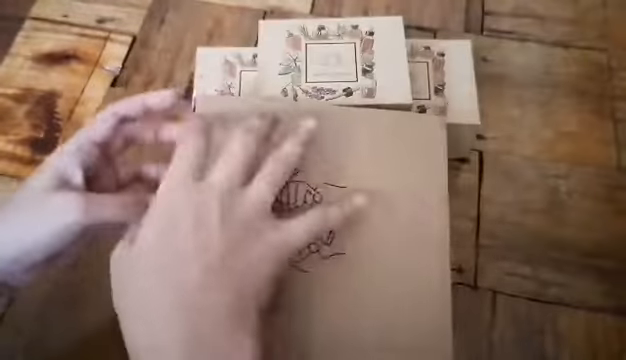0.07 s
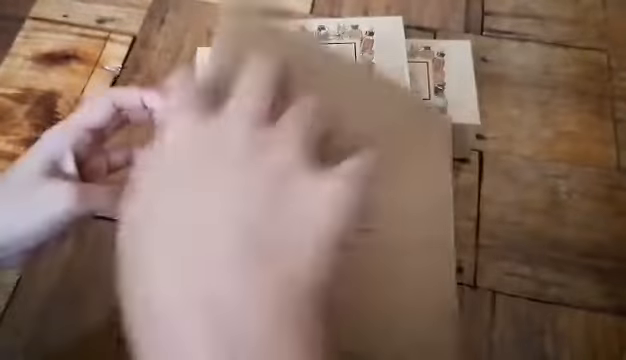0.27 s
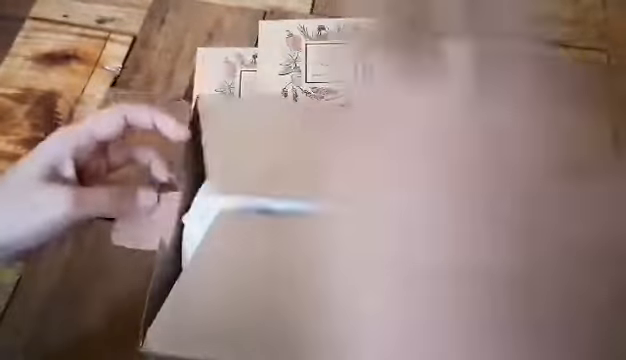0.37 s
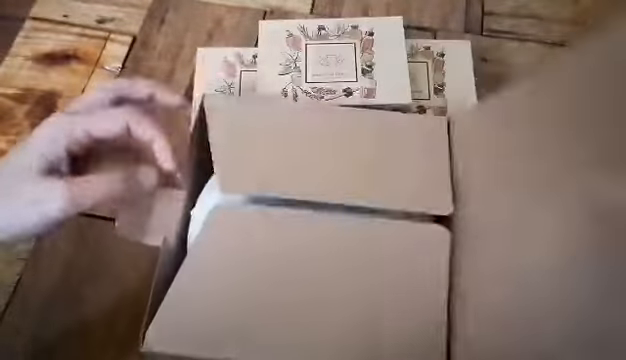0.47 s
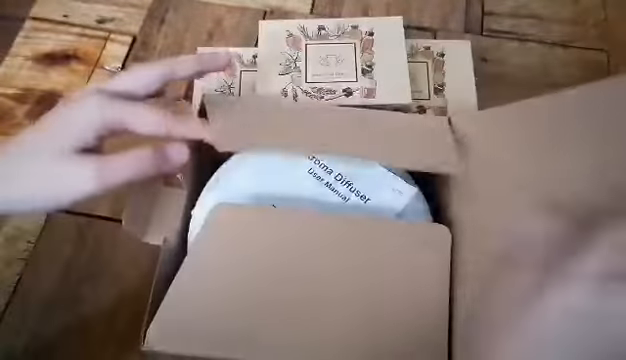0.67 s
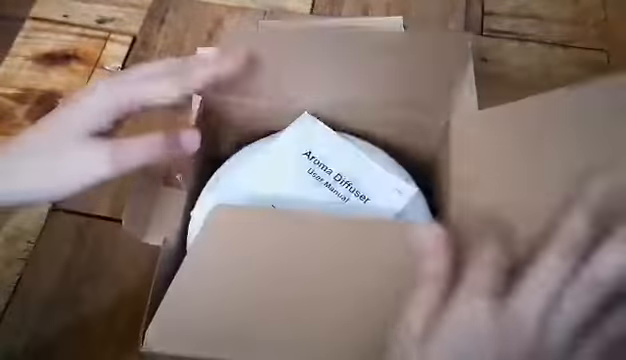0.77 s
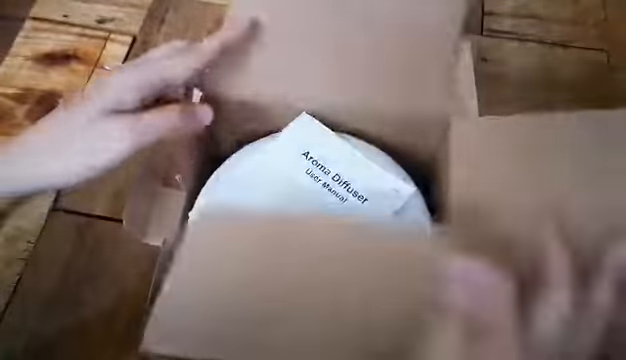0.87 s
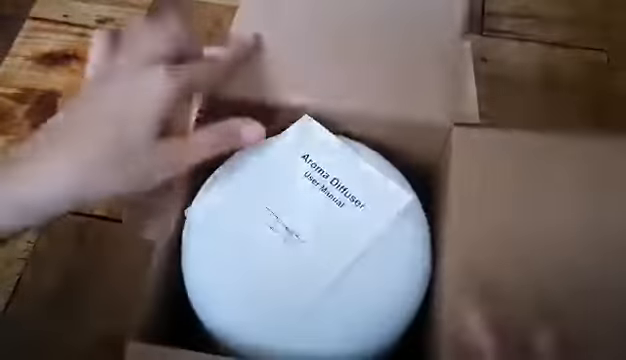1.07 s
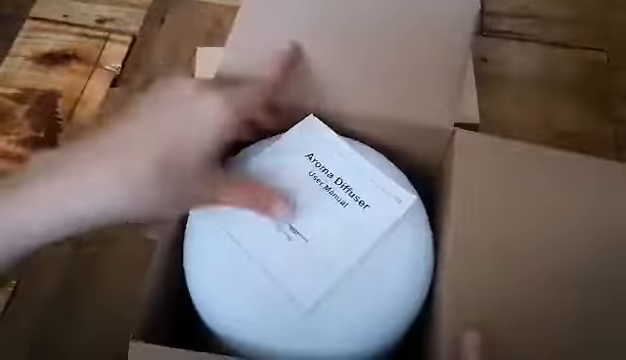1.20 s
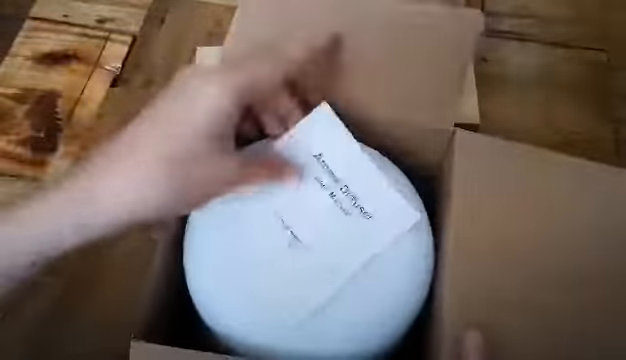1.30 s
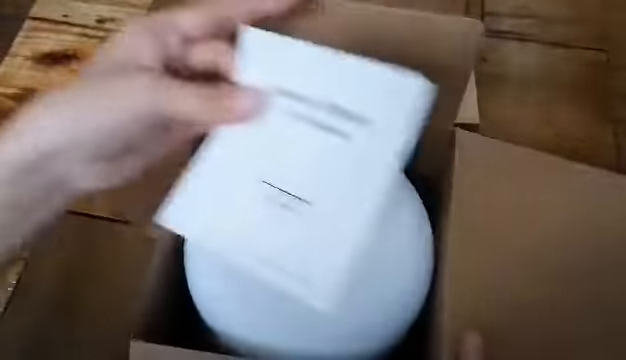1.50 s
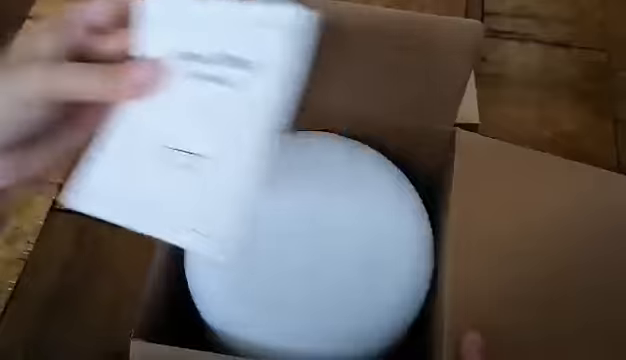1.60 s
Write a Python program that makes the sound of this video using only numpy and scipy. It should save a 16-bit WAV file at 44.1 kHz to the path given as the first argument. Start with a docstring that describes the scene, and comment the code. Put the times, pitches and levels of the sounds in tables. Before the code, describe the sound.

Cardboard flaps rub and snap open under tapping fingers, then a knock and brief paper slide.

```python
"""Hands open a cardboard box on a wooden table in a small live room, close by and a little to the right.
Fingers tap and rub the card, and the lid scrapes free by stick-slip friction (0.25 s). Flaps rub
and flex until one snaps open (0.66 s), driving the air in the hollow box into resonance. A finger
knocks on the contents (1.29 s), exciting the panel modes. Last, a paper leaflet slides out (1.5 s)."""
import sys
import numpy as np
from scipy import signal
from scipy.fft import rfft, irfft
from scipy.io import wavfile
from scipy.ndimage import uniform_filter1d

SR = 44100
rng = np.random.default_rng(int(sys.argv[2]) if len(sys.argv) > 2 else 0)


def wav_record(signal):
    """Record a signal, one row per channel, as 16-bit PCM in the file named by sys.argv[1]."""
    frames = np.transpose(np.atleast_2d(signal))
    bounded = np.clip(frames, -1, 1)
    # unit amplitude maps onto the largest positive 16-bit level
    quanta = np.round(bounded * 32767).astype(np.int16)
    wavfile.write(sys.argv[1], SR, quanta)


N = 72765
T = np.arange(N) / SR

# fingertips and nails on card (t/s, f/Hz, note level/dB, tick level/dB, pan L-R/dB)
FINGER_TAPS = [(.013, 871, -43, -59.5, -13.5), (.052, 858, -52, -54, 14), (.165, 810, -45.5, -73, -19.5),
               (.169, 1400, -48.5, -73, -16), (.581, 550, -50, -80, -4), (.618, 640, -43, -69, -10),
               (.679, 1040, -47, -57, -7), (.74, 724, -56, -47.5, -24.5), (.772, 650, -52, -49, -8),
               (.822, 1090, -43.5, -71, -5), (.946, 564, -46.5, -67, -2.5), (1.021, 838, -50, -62, 0),
               (1.191, 464, -39.5, -72, -1), (1.259, 650, -46.5, -53, -23.5), (1.37, 1014, -40, -60, -8),
               (1.374, 590, -59, -66, 1)]
# skin on the box (peak t/s, rise/s, fall/s, body level/dB, hiss level/dB, pan L-R/dB)
SKIN_RUBS = [(0.051, 0.049, 0.029, -64, -70, -4), (0.119, 0.024, 0.033, -66, -67.5, -1.5),
             (0.168, 0.013, 0.017, -56.5, -77, -4), (0.226, 0.017, 0.028, -56.5, -67, -2),
             (0.499, 0.06, 0.035, -56.5, -63.5, -5), (.62, 0.0068, 0.016, -65.5, -73.5, 9),
             (.72, 0.025, 0.026, -59.5, -58.5, -3), (0.854, 0.018, 0.022, -55.5, -57, -5.5),
             (.895, .03, 0.0094, -81, -58.5, -9.5), (0.998, 0.05, 0.036, -65.5, -60.5, -4.5),
             (1.12, .06, 0.18, -69.5, -68, -5), (1.207, 0.011, 0.015, -56, -55, -3),
             (1.261, 0.0077, 0.0048, -62, -52, -8), (1.33, 0.065, 0.056, -56, -92, -4.5),
             (1.38, 0.0025, 0.005, -47.5, -54, -6), (1.406, 0.02, 0.014, -79, -59.5, -3.5)]
# soft pushes on the panels (t/s, f/Hz, level/dB, T60/s)
PANEL_BUMPS = [(.164, 251, -42, 0.046), (0.281, 198, -39.5, 0.034), (.285, 92.6, -47.5, 0.11),
               (0.407, 271.5, -41, 0.057), (.435, 275, -33, 0.043), (0.487, 241.6, -46, 0.2),
               (0.54, 156, -46.5, 0.063), (.579, 300, -40, 0.12), (.597, 240, -45, 0.2),
               (0.613, 87, -37.5, 0.11), (0.669, 76, -51.5, 0.12), (0.837, 125.6, -41, 0.17),
               (0.867, 175, -43, 0.03), (.91, 238, -37, 0.032), (0.926, 125, -30.5, 0.028),
               (0.944, 167, -31.5, 0.068), (0.979, 181, -45, 0.027), (1, 144, -44.5, 0.08),
               (1.019, 210, -47, 0.046), (1.142, 143, -46.5, 0.13), (1.221, 118.5, -43, 0.2),
               (1.264, 98, -36.5, .1), (1.371, 300, -39, 0.035)]
# sliding lid, flap and leaflet (peak t/s, rise/s, fall/s, level/dB, pan L-R/dB)
LID_STROKES = [(.24, 0.0071, 0.019, -47.5, -6.5), (.263, 0.0085, 0.019, -42, -6),
               (.287, 0.0053, 0.0037, -35.5, -5), (.315, 0.016, 0.035, -53, -3.5)]
FLAP_STROKES = [(.4465, 0.0015, 0.0022, -48, -3.5), (.4687, 0.0038, 0.0022, -35.5, -7.5),
                (.478, 0.0025, 0.001, -41.5, -2), (.496, 0.0074, 0.0061, -53, 5)]
LEAFLET_STROKES = [(1.496, 0.013, 0.013, -51, -7), (1.509, 0.0092, 0.0077, -56.5, 0),
                   (1.528, 0.008, 0.0048, -66, 3)]
# flaps bending on their creases (peak t/s, rise/s, fall/s, level/dB)
CREASE_BENDS = [(0.309, 0.032, 0.02, -54), (.52, 0.033, 0.06, -54), (.62, 0.023, 0.035, -59),
                (.76, 0.15, 0.013, -55.5), (0.862, 0.028, 0.016, -53.5), (1.0, 0.051, 0.046, -52),
                (1.159, 0.023, 0.023, -60)]
# flap snap, then finger knock (t/s, then level/dB of blow, crack, boom, panels, swell, crackle)
IMPACTS = [(0.6636, -42, -32, -27, -44.5, -36, -46), (1.2909, -26.5, -33, -51, -46.5, -55, -48.5)]

# spectral density of each noise source (f/Hz, relative level/dB)
AIR_SPECTRUM = [(15, -49), (25, 2.5), (75, -4), (187, -10), (694, -20), (750, -15), (1050, -25),
                (3610, -28.5), (3900, -65), (4330, -28.5), (13000, -63.5)]
RUB_SPECTRUM = [(50, -16.5), (150, -1), (300, 3), (480, -3), (700, 0.5), (1000, -0.5), (1350, -4),
                (1750, 0.5), (2200, -25), (2900, -11.5), (4000, -21), (12000, -76)]
CRACK_SPECTRUM = [(400, 2), (1500, -9), (3000, -5), (4300, -2.5), (6000, -5.5), (7500, 6.5), (8600, -7),
                  (10500, -8), (12500, -23)]
HISS_SPECTRUM = [(500, 20), (1500, 8.5), (2800, 9), (4000, -1.5), (5500, 7.5), (7500, 11), (10000, 0),
                 (13000, -6)]
LID_SPECTRUM = [(110, -26), (230, -1), (420, -9), (600, -5.5), (850, -16), (1100, -7.5), (1600, -8.5),
                (2350, -16), (3300, -9.5), (4200, -18), (5600, -13), (6300, -22.5), (7200, -10.5),
                (8400, -17.5), (9500, -24.5), (13000, -40)]
BEND_SPECTRUM = [(45, -30.5), (65, 5), (100, 4), (140, -0.5), (185, 8), (240, -1), (310, -3.5),
                 (420, -21.5), (800, -17.5), (3000, -53)]
FLAP_SPECTRUM = [(240, -21), (400, -35), (805, -19), (1230, -19), (1670, -11.5), (2300, -22.5),
                 (3210, -16.5), (3560, -31), (3880, -17), (5830, -10), (10000, -23.5), (12300, -30.5),
                 (13000, -44)]
BLOW_SPECTRUM = [(70, -16.5), (130, -0.5), (450, 0), (800, 0), (1100, 0), (1500, -6), (1850, 7),
                 (2400, -19), (3000, -6), (4000, -22), (6000, -43), (8000, -18), (10500, -41), (13000, -42)]
CRACKLE_SPECTRUM = [(200, -13.5), (700, 6.5), (1700, -1.5), (2300, -0.5), (2900, 2.5), (4200, -15),
                    (6000, -5.5), (7500, -21), (10000, -18), (13000, -41)]
LEAFLET_SPECTRUM = [(1500, -36), (2800, -23), (4200, -17), (5500, -2.5), (7700, 3), (10000, -4.5),
                    (13000, -15)]
# resonances of the scraped sheets (f/Hz, bandwidth/Hz, relative level/dB)
LID_RESONANCES = [(1930, 190, 12.5), (2680, 200, 12.5), (6900, 530, -0.5)]
FLAP_RESONANCES = [(1680, 450, 3), (3296, 73, 16)]
# normal modes of the enclosed air and of the card panels (f/Hz, relative level/dB, T60/s)
CAVITY_MODES = [(236.4, -2.5, 0.2), (252.4, -14, 0.22)]
PANEL_MODES = [(145.5, -1.5, 0.13), (283.7, -3, 0.18), (481, 7.5, 0.06), (573, -4.5, 0.17),
               (784, 8.5, 0.042), (1059, 4.5, 0.11), (1257, 0, 0.068), (1410, -1, 0.048), (1820, -39, 0.12),
               (3000, -15, 0.12)]
# reverberant tail of the room by band (f/Hz, relative level/dB, T60/s)
ROOM_BANDS = [(113, -13.5, 0.45), (283, -18, 0.42), (870, -8.5, 0.28), (2310, -14.5, 0.4),
              (5860, 0.5, 0.28), (11400, -0.5, 0.24)]

SCRAPE_SLIPS_PER_S, SLOW_SLIPS_PER_S, CRACKLES_PER_S = 3200, 1800, 420
CATCH_S, CATCH_DB = 0.0037, 3  # time scale and depth of the bunching of slips
EARLY_DB, EARLY_DECAY_S, TAIL_ONSET_S, COHERENCE_HZ = 4, 0.0035, 0.0023, 665


def amp(db):
    """Amplitude ratio of a level in decibels."""
    return 10 ** (np.asarray(db) / 20)


def pan(x, db):
    """Interaural level difference sets direction; positive is left."""
    return x * amp(np.array([[db], [-db]]) / 2)


def causal(gain):
    """Minimum phase: folding the cepstrum gives the quickest causal filter with this gain."""
    cepstrum = irfft(np.log(gain))
    half = cepstrum.shape[-1] // 2
    cepstrum[..., 1:half] *= 2
    cepstrum[..., half + 1:] = 0
    return np.exp(rfft(cepstrum))


def colour(x, spectrum, resonances=(), size=8192):
    """Source-filter principle: a spectral envelope of unit power, with resonances, shapes x."""
    f = np.arange(size // 2 + 1) * SR / size + 1
    freqs, levels = np.array(spectrum, float).T
    gain = amp(np.interp(np.log(f), np.log(freqs), levels))
    gain /= np.hypot(1, (freqs[0] / 2 / f) ** 2)  # bass roll-off
    for hz, width, db in resonances:
        gain *= 1 + amp(db) / (1 + (2 * (f - hz) / width) ** 2)
    gain /= np.sqrt(np.mean(gain ** 2))
    return signal.fftconvolve(x, irfft(causal(gain)))[:N]


def ring(start, hz, t60, rise):
    """Damped oscillation: a struck mode swells briefly, then decays exponentially."""
    age = np.maximum(T - start, 0)
    return np.sin(2 * np.pi * hz * age) * np.exp(-np.log(1000) * age / t60) * (1 - np.exp(-age / rise))


def burst(start, decay):
    """Impulsive excitation: fibres crushed at a contact make sudden, decaying noise."""
    return rng.choice([-1., 1.], N) * (T >= start) * np.exp(-np.abs(T - start) / decay)


def stroke(peak, rise, fall):
    """Contact pressure of a stroke: Gaussian growth, then a near-exponential release."""
    growth = np.exp(-((T - peak) / rise) ** 2 / 2)
    release = np.exp(1 - np.hypot(1, (T - peak) / fall * np.sqrt(2)))
    return np.where(T < peak, growth, release)


def slips(per_s, scatter_db):
    """Stick-slip friction: random impulses of uneven size bunch into catches; unit rms."""
    knots = np.arange(0, 2, CATCH_S)
    catches = np.interp(T, knots, rng.standard_normal(N)[:len(knots)])
    clicks = (rng.random(N) < per_s / SR) * rng.choice([-1., 1.], N)
    clicks *= amp(scatter_db * np.clip(rng.standard_normal(N), -2, 2) + CATCH_DB * catches)
    return clicks / np.std(clicks)


def whiten(response, smooth_hz=110, gain_db=3, size=131072):
    """Inverse filtering flattens the smoothed spectrum of a response and keeps its echoes."""
    spectrum = rfft(response, size)
    power = uniform_filter1d(np.abs(spectrum) ** 2, int(smooth_hz * size / SR))
    return irfft(spectrum * causal(1 / np.sqrt(power)))[:, :N] * amp(gain_db)


def room(x, wet_db):
    """Convolution adds early reflections off table and flaps and a diffuse tail, coherent in the bass."""
    f = np.arange(N // 2 + 1) * SR / N + 1
    centres = np.array(ROOM_BANDS)[:, 0]
    mid, left, right, early_left, early_right = rfft(rng.standard_normal((5, N)))
    apart = f / np.hypot(f, COHERENCE_HZ)  # the ears differ more as frequency rises
    diffuse = mid * np.sqrt(1 - apart ** 2) + apart * np.array([left, right])
    early = irfft(apart * np.array([early_left, early_right]), N)
    response = early * np.exp(-T / EARLY_DECAY_S) * np.sqrt(2 / EARLY_DECAY_S / SR) * amp(EARLY_DB)
    onset = 1 - np.exp(-(T / TAIL_ONSET_S) ** 2)
    for share, (_, db, t60) in zip(np.eye(len(centres)), ROOM_BANDS):
        band = np.interp(np.log(f), np.log(centres), share)
        rate = np.log(1000) / t60
        decay = np.exp(-rate * T) * np.sqrt(2 * rate / SR)
        response += irfft(diffuse * band, N) * decay * onset * amp(db + wet_db)
    response[:, 0] += 1  # direct sound
    return signal.fftconvolve(x, whiten(response), axes=1)[:, :N]


def air():
    """Noise floor: room rumble and microphone hiss, partly correlated between the channels."""
    shared, left, right = (colour(rng.standard_normal(N), AIR_SPECTRUM) for _ in range(3))
    return pan(amp(-67) * (shared + 1.33 * np.array([left, right])), db=-2.5)


def taps():
    """Contact time sets bandwidth: a soft fingertip gives a gritty note, the hard nail a tick."""
    out = 0
    for start, hz, db, tick_db, side in FINGER_TAPS:
        note = ring(start, hz, t60=0.037, rise=0.0018)
        grit = amp(-10.5) * colour(burst(start, decay=0.0022), RUB_SPECTRUM)
        tick = colour(burst(start, decay=0.00044), CRACK_SPECTRUM)
        out += pan(amp(db) * (note + grit) + amp(tick_db) * tick, side)
    return out


def rubs():
    """Sliding friction of skin on card: a dull, grainy body under a dry hiss."""
    body = colour(slips(SLOW_SLIPS_PER_S, scatter_db=5), RUB_SPECTRUM)
    hiss = colour(slips(SLOW_SLIPS_PER_S, scatter_db=5), HISS_SPECTRUM)
    return sum(pan(stroke(peak, rise, fall) * (amp(body_db) * body + amp(hiss_db) * hiss), side)
               for peak, rise, fall, body_db, hiss_db, side in SKIN_RUBS)


def bumps():
    """Flexural vibration: a pushed panel swings briefly, at a pitch set by how it is held."""
    notes = sum(amp(db) * ring(start, hz, t60, rise=0.49 / hz) for start, hz, db, t60 in PANEL_BUMPS)
    return pan(notes, db=-3.5)


def scrapes(strokes, spectrum, resonances=()):
    """Forced vibration: the slips of a dragged edge drive a sheet of card or paper."""
    pressure = sum(pan(stroke(peak, rise, fall) * amp(db), side) for peak, rise, fall, db, side in strokes)
    force = pressure * slips(SCRAPE_SLIPS_PER_S, scatter_db=4.5)
    return np.array([colour(channel, spectrum, resonances) for channel in force])


def bends():
    """Stepwise yielding: creases fold in tiny slips, which the panels radiate as a rumble."""
    effort = sum(stroke(peak, rise, fall) * amp(db) for peak, rise, fall, db in CREASE_BENDS)
    rumble = colour(slips(SLOW_SLIPS_PER_S, scatter_db=4.5), BEND_SPECTRUM)
    return pan(effort * rumble, db=-3.5)


def impact(start, blow_db, crack_db, boom_db, panel_db, swell_db, crackle_db):
    """Modal excitation: a crack and a blow ring panels and cavity, and the settling card crackles."""
    pulse_s, swell_s, side_db = 0.00016, 0.0019, -5
    pulse = amp(-1) * np.exp(-((T - start - 2 * pulse_s) / pulse_s) ** 2)
    blow = amp(blow_db) * (colour(burst(start, decay=0.002), BLOW_SPECTRUM) - pulse)
    # a brief swell of noise leads into the crack
    swell = amp(swell_db) * (T < start) * np.exp(-np.abs(T - start) / swell_s) * rng.standard_normal(N)
    crack = colour(amp(crack_db) * burst(start, decay=0.001) + swell, CRACK_SPECTRUM)
    settling = burst(start, decay=0.041) * slips(CRACKLES_PER_S, scatter_db=2.8)
    crackle = amp(crackle_db) * colour(settling, CRACKLE_SPECTRUM)
    boom = sum(amp(boom_db + db) * ring(start, hz, t60, rise=0.0034) for hz, db, t60 in CAVITY_MODES)
    panels = sum(amp(panel_db + db) * ring(start, hz, t60, rise=0.0011) for hz, db, t60 in PANEL_MODES)
    card = blow + crack + crackle - panels
    return room(pan(card, side_db), wet_db=2) - room(pan(boom, side_db), wet_db=-18)


def scene():
    """Superposition: each spot on the box reaches the listener by its own paths, and the sounds add."""
    lid = scrapes(LID_STROKES, LID_SPECTRUM, LID_RESONANCES)
    flap = scrapes(FLAP_STROKES, FLAP_SPECTRUM, FLAP_RESONANCES)
    handling = sum(room(x, wet_db=0.5) for x in (lid, flap, rubs(), taps()))
    impacts = sum(impact(*row) for row in IMPACTS)
    leaflet = room(scrapes(LEAFLET_STROKES, LEAFLET_SPECTRUM), wet_db=-11.5)
    flexing = room(bumps() + bends(), wet_db=-3.5)
    return handling + flexing + impacts + leaflet + air()


def record(dry):
    """Band limiting: a steep elliptic low-pass removes the highest treble."""
    cutoff_hz = 13300
    return signal.sosfilt(signal.ellip(10, .2, 80, cutoff_hz, fs=SR, output="sos"), dry)


dry = scene()
out = record(dry)
wav_record(out)
```